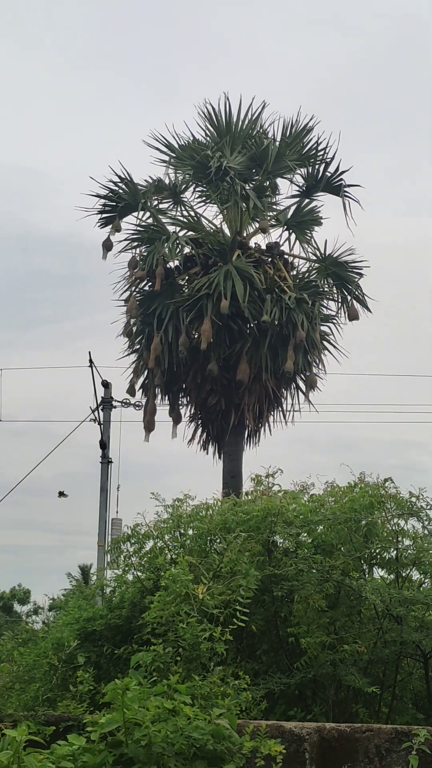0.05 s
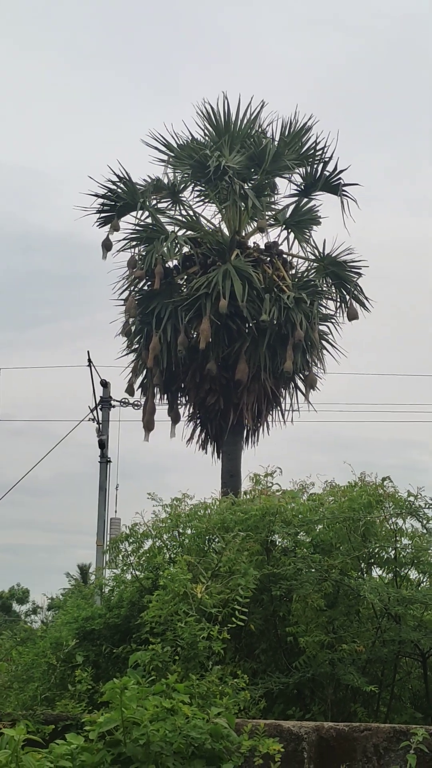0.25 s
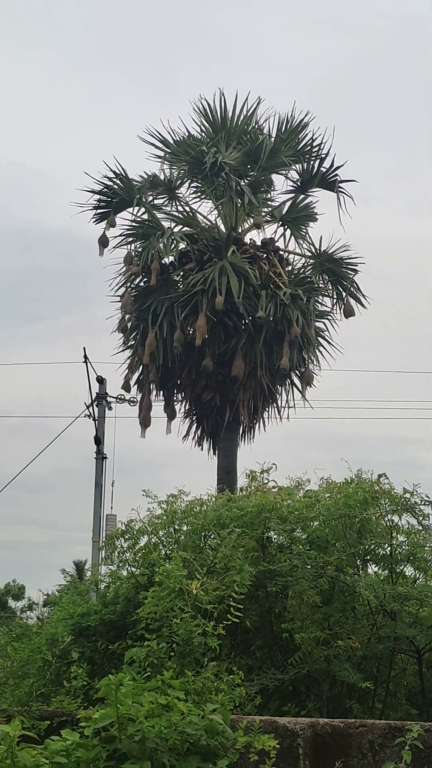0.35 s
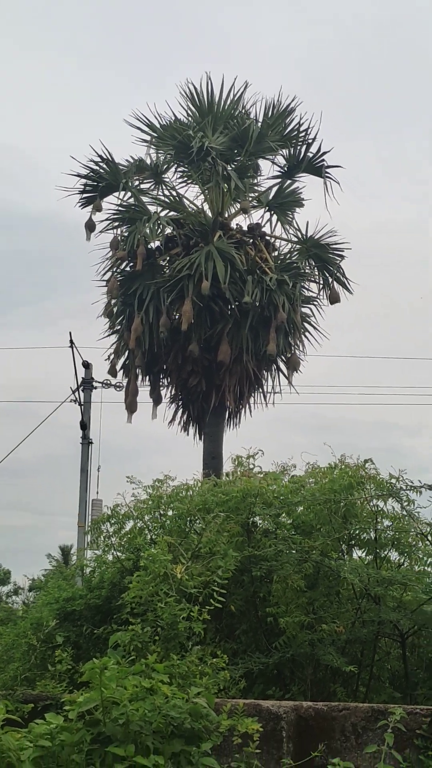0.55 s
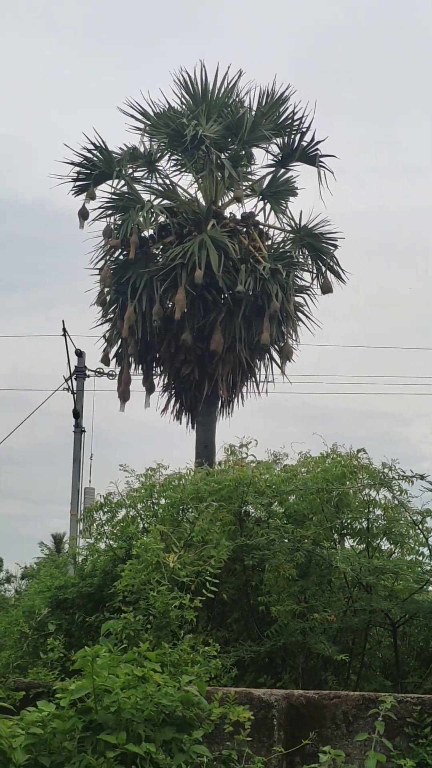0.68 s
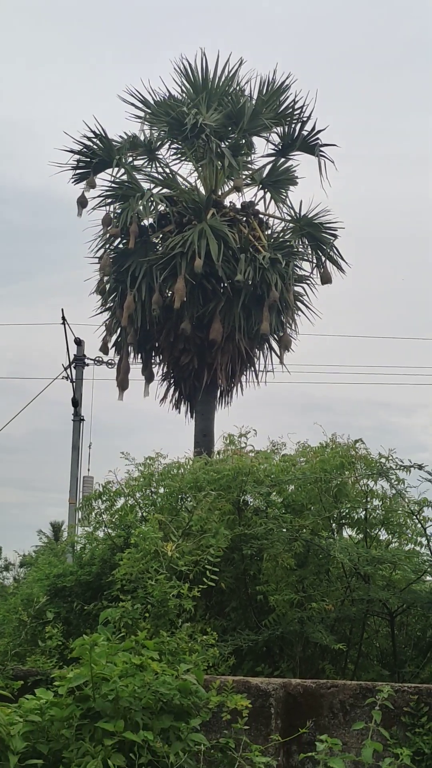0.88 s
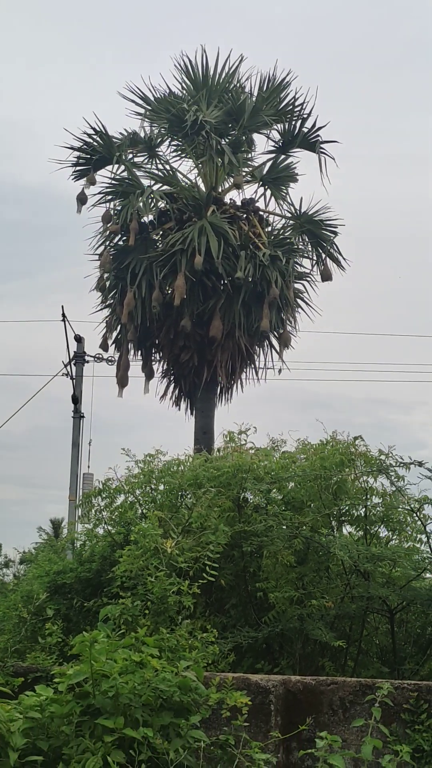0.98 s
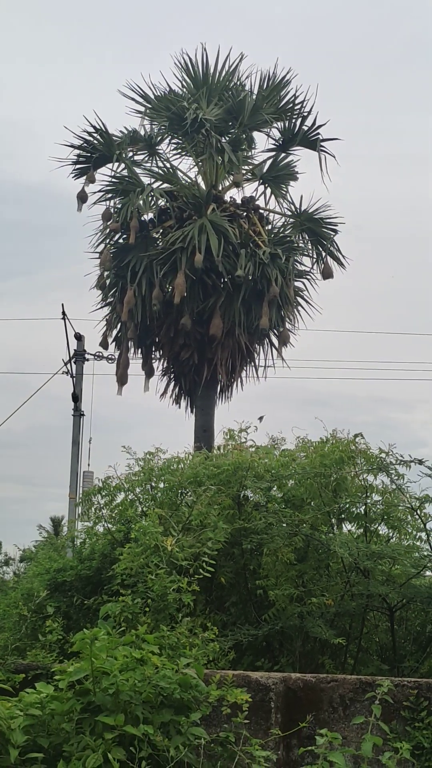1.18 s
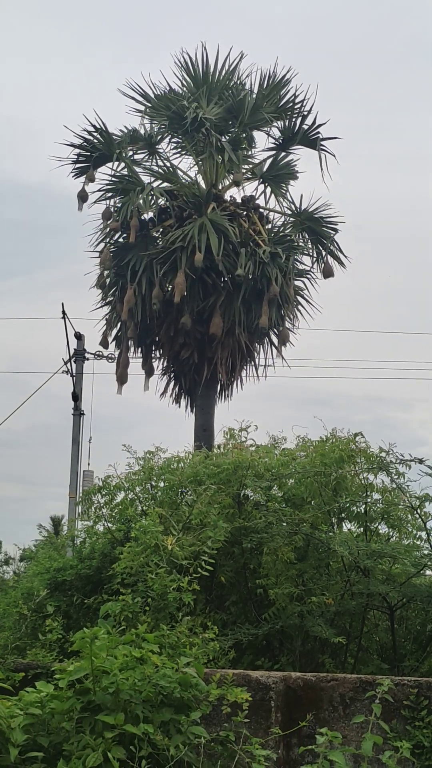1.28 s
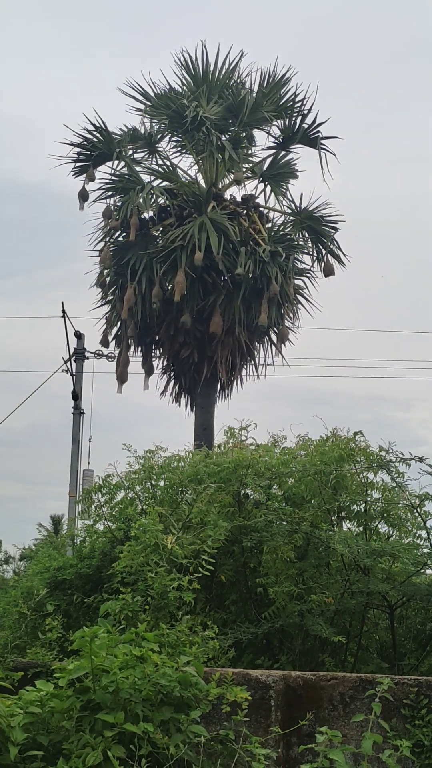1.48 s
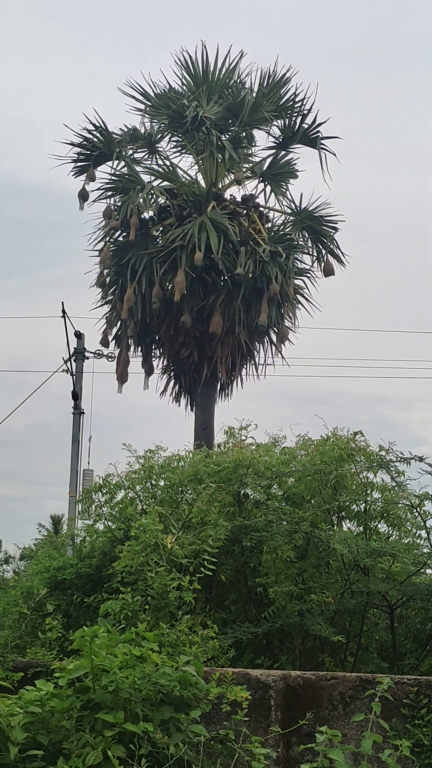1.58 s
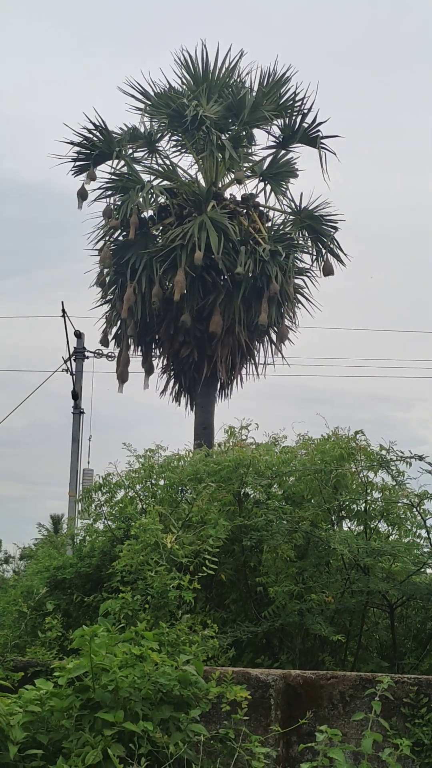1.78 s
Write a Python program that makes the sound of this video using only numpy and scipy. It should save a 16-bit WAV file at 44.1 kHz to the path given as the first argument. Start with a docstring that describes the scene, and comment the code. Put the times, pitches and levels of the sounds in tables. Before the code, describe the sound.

A colony of birds chatters with overlapping chirps and warbles over steady outdoor background noise.

```python
"""A colony of weaver birds chatters in a tall palm, a little off to one side, over steady outdoor air.
Quick arched chirps open, edged with hiss; high pips, thin whistles and two-voiced warbles follow at once,
all scattered by the leaves. Rasps join as a light gust swells and buffets the right microphone.
The gust is gone by one second; the birds carry on, and hoarse low calls answer from farther away."""
import sys
import numpy as np
from scipy import signal
from scipy.fft import rfft, irfft
from scipy.io import wavfile

SR = 44100
rng = np.random.default_rng(int(sys.argv[2]) if len(sys.argv) > 2 else 0)


def dump_mix(stems):
    """Bounce the given channels to the path in sys.argv[1] as a 16-bit WAV at rate SR."""
    frames = np.atleast_2d(stems).T  # one column per channel
    limited = np.clip(frames, -1, 1)  # hard clip at full scale
    pcm = np.round(limited * 32767).astype(np.int16)
    wavfile.write(sys.argv[1], SR, pcm)


N = 81585

# Tone of the outdoor bed: freq_hz, gain_db
AIR_EQ = [(25, -19.5), (60, -5.5), (280, -1), (500, -7), (1000, -10), (1700, -10.5), (3000, -14),
          (6500, -28), (7300, -28), (14000, -36.5)]
# How mono the bed is: freq_hz, left_right_correlation
AIR_LIKENESS = [(60, 1), (280, 0.914), (620, 0.843), (1340, 0.563), (2900, 0.075), (14000, 0)]
# Tone of wind on a microphone: freq_hz, gain_db
RUMBLE_EQ = [(20, -23.5), (50, -12), (90, 6.5), (160, -2), (250, -13), (400, -27.5), (900, -54.5)]
# Rise and fall of the gust: time_s, left_db, right_db
GUST_LEVELS = [(0, -58, -55), (.2, -54, -47), (.29, -46, -37.5), (.35, -57.5, -36.5), (0.419, -51, -26.5),
               (.47, -59, -46), (.51, -45.5, -38.5), (.56, -56.5, -48.5), (0.629, -55, -37),
               (.68, -71.5, -49.5), (.79, -66.5, -51), (.84, -54.5, -40.5), (.98, -64, -60),
               (1.85, -67, -70.5)]
# Eddies thumping the right microphone: time_s, pitch_hz, peak_db
BUFFETS = [(0.294, 143, -18), (0.334, 118, -27), (0.365, 132, -22.5), (.382, 166.4, -16),
           (0.3926, 194.9, -11), (0.4129, 130, -26.5), (.493, 132, -26.5)]
# Tone of the distant colony: freq_hz, gain_db
CHATTER_EQ = [(1200, -20), (1900, 2.5), (2350, 7.5), (3050, -25.5), (3600, -1), (4550, 7), (5200, -5),
              (6750, -3), (7000, -17), (10800, -41.5), (11900, -16), (14300, -25)]
# Swells of the distant colony: time_s, level_db
CHATTER_LEVELS = [(0, -49), (.21, -50), (.33, -49.5), (.56, -48.5), (.65, -54.5), (.79, -54), (.9, -53),
                  (1.25, -43.5), (1.32, -56), (1.42, -47.5), (1.7, -56), (1.85, -50)]
# Tone of the hiss round the chirps: freq_hz, gain_db
FIZZ_EQ = [(4000, -32.5), (6000, 8.5), (7500, 3.5), (9200, 0), (10500, -24.5), (12000, -24), (14300, -24)]
# Arched chirps: top_s, top_hz, rise_s, fall_s, level_db, second_voice_relative_db
CHIRPS = [(0.015, 4450, .011, 0.0152, -46, -1.5), (.04, 4400, 0.01386, 0.015, -43, -2),
          (.2, 4868, 0.0068, 0.0077, -44.5, -15), (0.223, 4687, .017, 0.031, -43.5, -26),
          (0.365, 4462, 0.0098, 0.026, -42.5, -3), (.396, 4565, .014, 0.013, -40.5, -4),
          (.471, 4436, 0.00216, 0.0088, -42.5, -19), (.491, 4369, .016, 0.0216, -45, -12.5),
          (0.703, 4397, 0.0076, 0.0133, -45.5, 0.5), (.728, 4519, 0.014, 0.0177, -46, 1.5),
          (.92, 4400, 0.01825, 0.0202, -47, 1.5), (1.064, 4630, 0.0038, 0.0179, -42.5, -21),
          (1.091, 4550, 0.016, 0.0217, -45.5, 2), (1.212, 3900, 0.00442, 0.0207, -44, -11),
          (1.257, 4533, .014, .022, -44, 1), (1.451, 4511, 0.0192, 0.0296, -45, 1),
          (1.486, 4730, .005, 0.0104, -55.5, -6.5), (1.515, 4540, 0.0225, 0.019, -46.5, -17),
          (1.621, 4480, 0.00476, .0106, -42.5, -13.5), (1.648, 4400, 0.0248, 0.0112, -48.5, 2),
          (1.825, 4393, .0046, 0.0114, -47.5, -6), (1.847, 4320, 0.0113, 0.0102, -47.5, -8)]
# High pips: start_s, pitch_hz, level_db
PIPS = [(.047, 5720, -52), (0.231, 6320, -41), (0.5, 6090, -43.5), (.734, 5870, -48.5),
        (1.218, 5950, -47.5), (1.523, 5911, -45), (1.657, 5596, -53)]
# Thin whistles: start_s, length_s, pitch_hz, level_db
WHISTLES = [(0.065, 0.0506, 4704, -45.5), (.589, 0.057, 4656, -49), (1.118, 0.0386, 4660, -44.5),
            (1.518, 0.026, 4680, -46.5), (1.546, 0.0298, 4610, -39.5), (1.565, 0.058, 4640, -51)]
# Two-voiced warbles: start_s, length_s, upper_hz, upper_db, lower_db, swing_anchor_s
WARBLES = [(0.09, 0.0646, 4250, -50, -44, 0.085), (.241, 0.0818, 4100, -46.5, -43, 0.2306),
           (.394, 0.0756, 3950, -49, -42, 0.36), (0.525, 0.0858, 4050, -48, -43, .546),
           (.663, 0.0837, 3850, -46.5, -44.5, 0.7), (0.81, 0.0898, 3900, -45, -45.5, 0.855),
           (.962, 0.081, 3870, -48, -50, 0.86), (1.135, 0.0794, 3900, -49, -50.5, 1.343),
           (1.338, 0.0876, 3820, -45, -47, 1.355)]
# Rasps: start_s, length_s, level_db
RASPS = [(0.236, 0.0675, -43.5), (.38, .052, -43), (.51, 0.0703, -46.5), (.685, 0.0813, -51),
         (.871, 0.038, -48.5), (1.09, 0.02, -46.5), (1.214, 0.0668, -47), (1.39, 0.0485, -51.5),
         (1.57, 0.0615, -51.5)]
# Tone of a rasp: freq_hz, gain_db
RASP_EQ = [(1200, -33), (2300, 4.5), (3050, -0.5), (3700, 2.5), (4500, -5.5), (5400, -1), (6750, -0.5),
           (7000, -10.5), (10800, -22), (12000, -21.5), (14300, -23.5)]
# Far low calls: start_s, length_s, pitch_hz, level_db
FAR_CALLS = [(1.207, 0.045, 2210, -49), (1.573, 0.1216, 2110, -48), (1.653, 0.093, 2530, -49.5),
             (1.755, 0.0495, 2210, -46)]
# Colour of the birds at the left microphone: freq_hz, gain_db
LEFT_EQ = [(1000, -6.5), (2300, -15.5), (3500, -4), (4200, -11.5), (5400, -2), (6700, -13), (10000, 0.5),
           (12000, 1)]
# Colour of the birds at the right microphone: freq_hz, gain_db
RIGHT_EQ = [(2500, 0), (3100, 1.5), (3600, 0), (9000, 0), (10500, -9)]


def amp(db):
    """Decibels to gain."""
    return 10 ** (np.asarray(db) / 20)


def unit(x):
    """Scales to rms 1."""
    return x / np.sqrt(np.mean(x ** 2) + 1e-20)


def read(points, hz):
    """Reads a table on a log-frequency axis."""
    freq_hz, value = np.transpose(points)
    return np.interp(np.log(hz + 1), np.log(freq_hz + 1), value)


def colour(x, eq):
    """Filters by an EQ curve."""
    hz = np.fft.rfftfreq(x.shape[-1], 1 / SR)
    return irfft(rfft(x) * amp(read(eq, hz)), x.shape[-1])


def noise(eq):
    """Coloured noise, rms 1."""
    return unit(colour(rng.standard_normal(N), eq))


def drift(count, rate_hz):
    """Smooth random motion up to a rate, rms 1."""
    hz = np.fft.rfftfreq(count + 4096, 1 / SR)
    white = rfft(rng.standard_normal(2 * len(hz) - 2))
    return unit(irfft(white / (1 + (hz / rate_hz) ** 4)))[:count]


def add(mix, start_s, sound):
    """Mixes a sound in at a time."""
    part = mix[max(round(start_s * SR), 0):][:len(sound)]
    part += sound[:len(part)]


def gate(t, attack_s, release_s):
    """Fade in, hold, fade out."""
    return np.clip(t / attack_s, 0, 1) * np.clip((t[-1] - t) / release_s, 0, 1)


def air(level_db=-50):
    """A steady bed of distant outdoor noise, nearly mono in the lows and wide on top."""
    left, other = rfft(noise(AIR_EQ)), rfft(noise(AIR_EQ))
    likeness = read(AIR_LIKENESS, np.fft.rfftfreq(N, 1 / SR))
    right = likeness * left + np.sqrt(1 - likeness ** 2) * other
    return amp(level_db) * irfft(np.array([left, right]), N)


def wind():
    """Each microphone gets its own rumble, and single eddies thump the right one."""
    t = np.arange(N) / SR
    time_s, *sides_db = np.transpose(GUST_LEVELS)
    out = np.array([noise(RUMBLE_EQ) * amp(np.interp(t, time_s, db)) for db in sides_db])
    for at_s, pitch_hz, peak_db in BUFFETS:
        spread = (np.pi * pitch_hz * (t - at_s)) ** 2
        out[1] += amp(peak_db) * (1 - 2 * spread) * np.exp(-spread)
    return out


def voice(hz, jitter=.018, flutter=.25, rate_hz=475):
    """One side of the syrinx: a near-sine with jitter in pitch and flutter in level."""
    phase = 2 * np.pi * np.cumsum(hz * (1 + jitter * drift(len(hz), rate_hz))) / SR
    return np.sqrt(2) * np.sin(phase) * (1 + flutter * drift(len(hz), rate_hz))


def chatter(twitters_per_s=74, twitter_hz=4200, twitter_db=-62.5):
    """The rest of the colony: faint random twitters in a wash blurred by distance."""
    swell_db = np.interp(np.arange(N) / SR, *np.transpose(CHATTER_LEVELS))
    out = noise(CHATTER_EQ) * amp(swell_db + 2.58 * drift(N, 40.2))
    t = np.arange(0, .03, 1 / SR)
    for when, pitch, glide in rng.uniform(-1.1, 1, (round(twitters_per_s * N / SR), 3)):
        hz = twitter_hz * (1 + .079 * (pitch + glide * np.cos(np.pi * t / t[-1])))
        add(out, (when + 1) / 2 * N / SR, amp(twitter_db) * np.hanning(len(t)) * voice(hz))
    return out


def palm(dry, fronds_db=-10.5, tail_db=-8, early_s=.00743, t60_s=.113, right_delay_s=.00016064):
    """Calls reach the left microphone first; near fronds scatter them, bushes add a short tail."""
    t = np.arange(SR // 2) / SR
    taps = rng.standard_normal((2, len(t))) * (rng.random((2, len(t))) < .1)
    early = unit(taps * (t < early_s))
    tail = unit(taps * (t >= early_s) * amp(-60 * t / t60_s))
    echoes = (amp(fronds_db) * early + amp(tail_db) * tail) / np.sqrt(len(t))
    wet = signal.fftconvolve(dry[None], echoes, axes=1)[:, :N]
    delay = np.exp(-2j * np.pi * np.fft.rfftfreq(N, 1 / SR) * right_delay_s)
    return np.array([dry, irfft(rfft(dry) * delay, N)]) + wet


def fizz(level_db=-59, tick_db=3.5, tick_hz=187.9, swell_s=.055, fade_s=.052):
    """A ticking hiss swells and fades round every chirp."""
    t = np.arange(N) / SR
    power = sum(np.interp(t - top_s, [-swell_s, 0, fade_s], [0, 1, 0]) ** 2 for top_s, *_ in CHIRPS)
    return amp(level_db + tick_db * drift(N, tick_hz)) * np.sqrt(power) * noise(FIZZ_EQ)


def chirp(top_s, top_hz, rise_s, fall_s, level_db, second_db):
    """The pitch arches up and slides far down; a second, higher voice joins round the top."""
    rise_width_s, fall_width_s = .006531, .017
    t = np.arange(-rise_s, fall_s, 1 / SR)
    foot = np.where(t < 0, .8, .48)  # base of the arch as a share of the top pitch
    width_s = np.where(t < 0, rise_width_s, fall_width_s)
    hz = top_hz * (foot + (1 - foot) * np.exp(-(abs(t) / width_s) ** 1.469))
    second = amp(second_db) * np.exp(-(t / fall_width_s) ** 2) * voice(hz * 1.145, flutter=.358)
    octave = amp(-17.5) / (1 + (2 * hz / 7980) ** 16) * voice(2 * hz)  # shows on the low flanks
    fade_db = -8 * np.clip(t / fall_s, 0, 1)
    envelope = amp(level_db + fade_db) * gate(t + rise_s, .00184, .00095)
    return top_s - rise_s, envelope * (voice(hz) + second + octave)


def pip(start_s, pitch_hz, level_db, length_s=.02, wobble_hz=112, wobble=.032, sag=.06):
    """A short high note that wobbles as it sags."""
    t = np.arange(0, length_s, 1 / SR)
    hz = pitch_hz * (1 + wobble * np.cos(2 * np.pi * wobble_hz * t) + sag * (.5 - t / length_s))
    return start_s, amp(level_db) * gate(t, .00165, .0057) * voice(hz)


def whistle(start_s, length_s, pitch_hz, level_db, sag_hz_per_s=2640):
    """A thin, nearly level note with a slight flutter."""
    t = np.arange(0, length_s, 1 / SR)
    tone = voice(pitch_hz - sag_hz_per_s * t, jitter=.017, flutter=.3)
    return start_s, amp(level_db) * gate(t, .0048, .0241) * tone


def warble(start_s, length_s, upper_hz, upper_db, lower_db, anchor_s):
    """Two voices start high, settle and swing together; their sum tone sounds faintly."""
    lower_hz, swing_hz, settle_s = 2352.2, 61.64, .012
    upper_depth, lower_depth = .0956, .043
    t = np.arange(0, length_s, 1 / SR)
    turn = 2 * np.pi * swing_hz * (start_s + t - anchor_s)
    swing = -np.cos(turn) - .145 * np.sin(2 * turn)  # quickly up, slowly down
    lift = np.exp(-t / settle_s)
    upper = voice(upper_hz * (1 + upper_depth * swing + .1134 * lift))
    upper *= 1 - .33 * np.sin(turn - .7)  # the level throbs with the swing
    lower = voice(lower_hz * (1 + lower_depth * swing + .3 * lift))
    lower *= (1 - lift) * (1 - .243 * np.sin(turn))
    sum_tone = amp(-13.5) * voice((upper_hz + lower_hz) * (1.015 + lower_depth * swing))
    blend = amp(upper_db) * upper + amp(lower_db) * (lower + sum_tone)
    return start_s, gate(t, .0078, .01126) * blend


def rasp(start_s, length_s, level_db, buzz_hz=187.9, depth=.21):
    """A harsh buzz: broad noise roughened by uneven pulses."""
    t = np.arange(0, length_s, 1 / SR)
    pulse_hz = buzz_hz * (1 + .287 * drift(len(t), 103.3))
    pulses = 1 + depth * np.sin(2 * np.pi * np.cumsum(pulse_hz) / SR)
    return start_s, amp(level_db) * gate(t, .0042, .0098) * pulses * noise(RASP_EQ)[:len(t)]


def far_call(start_s, length_s, pitch_hz, level_db):
    """A low call from farther away, hoarse with heavy jitter."""
    t = np.arange(0, length_s, 1 / SR)
    tone = voice(np.full(len(t), pitch_hz), jitter=.1248, flutter=.505)
    return start_s, amp(level_db) * gate(t, .00496, .0178) * tone


def scene():
    """Each kind of call has its own perch in the palm; hiss comes from all round; air and wind below."""
    birds = palm(chatter()) + np.array([fizz(), fizz()])
    for call, table in ((chirp, CHIRPS), (pip, PIPS), (whistle, WHISTLES),
                        (warble, WARBLES), (rasp, RASPS), (far_call, FAR_CALLS)):
        perch = np.zeros(N)
        for row in table:
            add(perch, *call(*row))
        birds += palm(perch)
    return np.array([colour(birds[0], LEFT_EQ), colour(birds[1], RIGHT_EQ)]) + air() + wind()


def record(dry):
    """A low cut trims the deepest rumble and a steep high cut closes the top."""
    low_cut_hz, high_cut_hz = 46, 14300
    hz = np.fft.rfftfreq(N, 1 / SR)
    trimmed = irfft(rfft(dry) * hz ** 3 / np.sqrt(hz ** 6 + low_cut_hz ** 6), N)
    high_cut = signal.firwin(511, high_cut_hz, window=("kaiser", 9), fs=SR)
    return signal.oaconvolve(trimmed, high_cut[None], "same", axes=1)


dry = scene()
out = record(dry)
dump_mix(out)
```